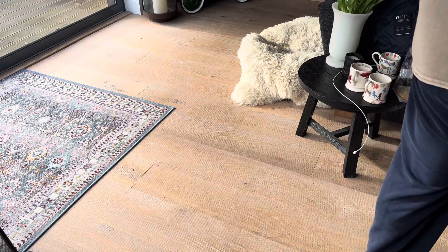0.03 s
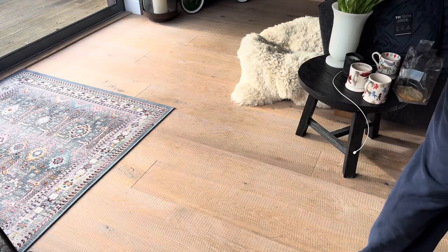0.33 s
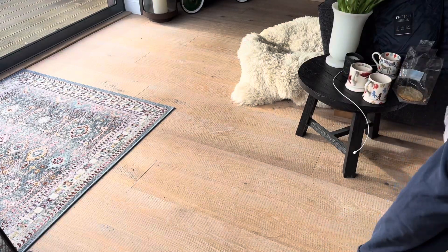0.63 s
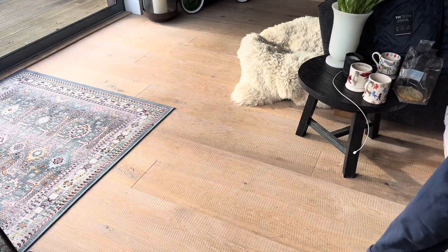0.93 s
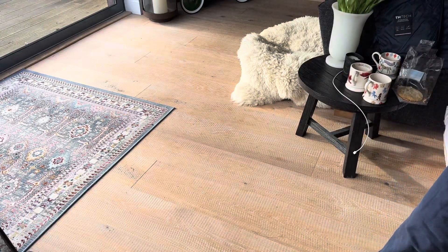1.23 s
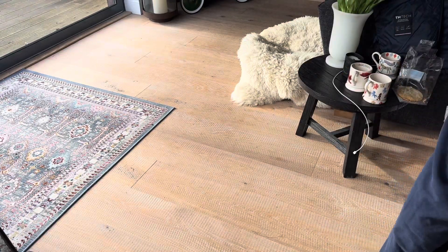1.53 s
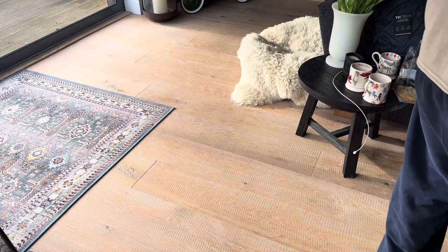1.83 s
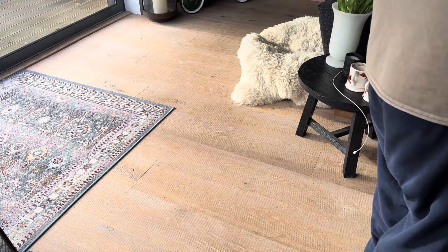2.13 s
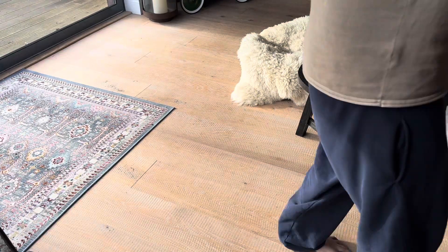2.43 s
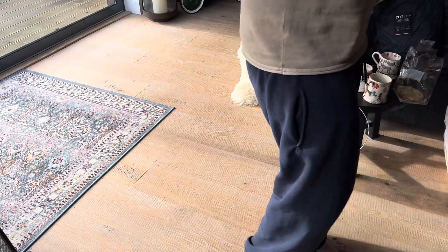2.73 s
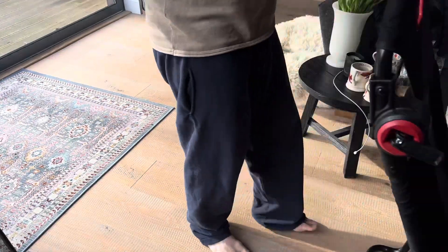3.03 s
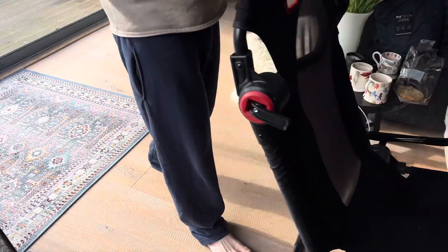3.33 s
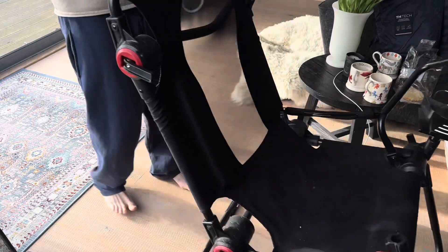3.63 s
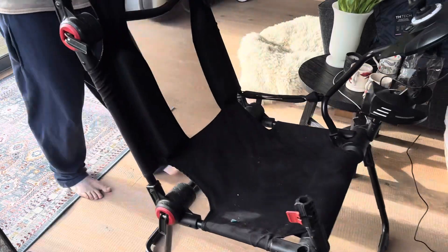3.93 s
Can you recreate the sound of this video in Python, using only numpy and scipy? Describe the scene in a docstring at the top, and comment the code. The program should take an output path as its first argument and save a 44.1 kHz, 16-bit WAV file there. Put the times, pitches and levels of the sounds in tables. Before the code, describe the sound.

In a quiet room, wheels rumble across floorboards after a few soft barefoot steps, clothing rustle and light ticks. The gritty rolling grows louder as it nears the microphone, with repeated bumps, a faint scrape and lightly ringing frame tubes.

```python
"""In a living room, a wheeled frame is pushed over a wooden floor, coming close to the microphones.
First come swishes of cloth, soft footsteps and small clicks of handling. Then the wheels drone, grit
under them shakes the boards, and they bump over the joints. A tyre scrapes, and the tubes of the
frame ring faintly as it passes."""
import sys
import numpy as np
from scipy import signal
from scipy.fft import rfft, irfft
from scipy.io import wavfile
from scipy.ndimage import uniform_filter1d

SR = 44100
rng = np.random.default_rng(int(sys.argv[2]) if len(sys.argv) > 2 else 0)


def put_to_file(sound):
    """Save the sound as 16-bit audio at rate SR, in the file named by the first command-line argument."""
    columns = np.atleast_2d(sound).T  # one column per channel
    safe = np.clip(columns, -1, 1)
    whole_steps = np.round(safe * 32767)
    wavfile.write(sys.argv[1], SR, whole_steps.astype(np.int16))


N = 176400
TIME, FREQ = np.arange(N) / SR, np.fft.rfftfreq(N, 1 / SR)
ROOM_ECHO_S = .22  # time to fade by 60 dB, called t60 below

# tone of the shaken floorboards (frequency [Hz], gain [dB])
FLOOR_TONE = [(42, -64), (60, -31), (90, -6.5), (130, -15.5), (210, -3.5), (260, -5), (330, -9.5), (430, 2),
              (560, -0.5), (760, -4), (1000, -13.5), (1400, -21), (3000, -60)]


def amp(db):
    """Turns decibels into a factor to multiply by."""
    return 10 ** (np.asarray(db) / 20)


def unit(x):
    """Scales a sound to an average strength (rms) of 1."""
    return x / np.sqrt(np.mean(x ** 2) + 1e-20)


def over_hz(table):
    """Joins a table's points into a curve over frequency, spaced by octaves."""
    hz, value = np.transpose(table)
    return np.interp(np.log(FREQ + 1), np.log(hz + 1), value)


def over_time(table, column=1):
    """Joins one column's points into a curve over time."""
    rows = np.array(table)
    return np.interp(TIME, rows[:, 0], rows[:, column])


def level(table, column=1):
    """Volume over time from a dB column, fading in just before the first row."""
    fade_in = np.clip((TIME - table[0][0]) * 20 + 1, 0, 1)
    return amp(over_time(table, column)) * fade_in


def envelope(start, rise, hold, t60):
    """Volume of one event: it rises, holds and dies away (all in seconds)."""
    t = TIME - start
    return np.clip(t / rise, 0, 1) * amp(-60 * np.maximum(t - rise - hold, 0) / t60)


def noise():
    """Two unrelated white noises."""
    return rng.standard_normal((2, N))


def colour(x, tone, tilt_db=0):
    """Filters a sound by a tone table; a positive tilt (dB per octave) brightens it."""
    octaves = np.log2(np.maximum(FREQ, 100) / SR)
    return unit(irfft(rfft(x) * amp(over_hz(tone) + tilt_db * octaves), N))


def flutter(rate_hz, depth_db):
    """A factor that wavers at random around 1, up to the given rate."""
    slow = irfft(rfft(rng.standard_normal(N)) / (1 + (FREQ / rate_hz) ** 4), N)
    return amp(depth_db * unit(slow))


def ring(x, t60):
    """Smears a sound into a tail of many random tones that fade together."""
    t = TIME[:SR // 2]
    tail = rng.standard_normal((2, len(t))) * amp(-60 * t / t60)
    return signal.fftconvolve(x, tail / np.linalg.norm(tail[0]), axes=1)[:, :N]


def resonate(x, hz, width_hz):
    """A resonance: keeps only the sound near one pitch, which may slide."""
    turn = np.exp(2j * np.pi * np.cumsum(hz * np.ones(N)) / SR)
    decay = np.exp(-np.pi * width_hz * np.sqrt(2) / SR)
    narrow = signal.lfilter([(1 - decay) ** 2], [1, -2 * decay, decay * decay], x / turn)
    return unit((turn * narrow).real)


def sustained(hz, width_hz, steadiness=.7):
    """A resonance fed without pause; steadiness (0 to 1) evens out its strength."""
    note = resonate(noise(), hz, width_hz)
    power = uniform_filter1d(abs(signal.hilbert(note)) ** 2, size=900, axis=1)
    evened = note / (abs(power) + 0.014) ** (steadiness / 2)
    return resonate(evened, hz, 4 * width_hz)


def room():
    """The faint, low hush of the room."""
    # tone of the hush (frequency [Hz], gain [dB])
    hush_tone = [(25, -23), (60, -1), (150, -2.5), (400, -5), (900, -12.5), (5000, -36), (15000, -31)]
    return amp(-62) * colour(noise(), hush_tone)


def footsteps():
    """Bare feet thud on the boards."""
    # steps and soft knocks (time [s], level [dB], rise [s], t60 [s], tilt [dB per octave])
    steps = [(0.041, -33.5, 0.0068, 0.39, 0), (0.1, -37, 0.0071, 0.61, 0), (0.164, -40, 0.0054, 0.39, 1),
             (0.235, -34.5, 0.0043, 0.25, -3), (.275, -39, 0.0059, 0.24, -20),
             (.401, -45, 0.0027, 0.12, 2.5), (.68, -49.5, 0.047, 0.33, 0.5),
             (0.749, -51.5, 0.0043, 0.38, 2.5), (0.869, -50, .008, 0.51, 2),
             (.915, -47.5, 0.011, 0.25, -18), (1.02, -55.5, 0.022, 0.58, 2), (1.157, -43, 0.0069, 0.28, 3)]
    # tone of a thud (frequency [Hz], gain [dB])
    thud_tone = [(28, -31), (65, 1), (110, -2), (170, 2.5), (270, -2.5), (400, -7), (700, -12), (1200, -20),
                 (3000, -47), (12000, -53)]
    return sum(amp(db) * envelope(start, rise, 0, t60) * colour(noise(), thud_tone, tilt)
               for start, db, rise, t60, tilt in steps)


def cloth():
    """Cloth and soles rub and swish."""
    # swishes (time [s], level [dB], rise [s], hold [s], t60 [s], tilt [dB per octave])
    swishes = [(-.01, -42, 0.012, 0.038, 0.39, -0.5), (0.22, -48.5, 0.01, .005, 0.5, -4.5),
               (0.393, -55, 0.0065, 0.032, 0.35, -4.5), (0.487, -57.5, 0.0027, 0.01, 0.48, -1.5),
               (0.867, -67.5, .006, .15, .4, -1), (1.07, -57, 0.021, 0.02, 0.32, -2.5),
               (1.157, -51.5, .008, 0.018, 0.2, 2)]
    # tone of a swish (frequency [Hz], gain [dB])
    swish_tone = [(100, -8.5), (400, -2.5), (1200, -1.5), (2500, -0.5), (5000, -8.5), (8500, -10),
                  (12000, -13.5), (15500, -17)]
    return sum(amp(db) * envelope(start, rise, hold, t60) * colour(noise(), swish_tone, tilt)
               for start, db, rise, hold, t60, tilt in swishes)


def clicks():
    """Sharp ticks from handling and from the frame echo in the room."""
    # ticks (time [s], level [dB], strongest frequency [Hz])
    ticks = [(0.2266, -48, 6460), (0.405, -56, 10000), (.446, -48, 9000), (.448, -42.5, 2100),
             (0.494, -52, 6960), (.5, -45.5, 2200), (1.1503, -39, 8000), (3.33, -26, 9100)]
    direct = np.zeros((2, N))
    for start, db, hz in ticks:
        octaves_away = abs(np.log2((FREQ + 1) / hz))
        band = unit(irfft(rfft(noise()) * amp(-13 * octaves_away), N))
        direct += amp(db) * envelope(start, rise=1 / SR, hold=0, t60=.008) * band
    return direct + amp(-5) * ring(direct, ROOM_ECHO_S)


def grit(hits_per_s=7000, spread_db=2):
    """Tiny impacts of uneven size under the wheels."""
    size = amp(spread_db * np.minimum(rng.exponential(1, N), 5))
    return unit(noise() * size * (rng.random(N) < hits_per_s / SR))


def squeak():
    """The frame gives one brief squeak."""
    return amp(-35) * envelope(start=3.59, rise=.0092, hold=.019, t60=.08) * sustained(2740, width_hz=56)


def tyre_scrape():
    """A tyre rubs as its wheel swings into line; its resonances swell at random."""
    # strength of the rubbing (time [s], level [dB])
    rubbing = [(1.67, -60), (1.71, -38.5), (1.8, -49), (2.1, -43), (2.6, -40), (2.97, -49.5), (3.1, -41),
               (3.72, -42.5), (4, -51)]
    # resonances of the scrape (pitch [Hz], relative level [dB])
    notes = [(2735, -1), (3100, 0), (3250, 0), (3400, -4), (3670, -3), (4090, -5), (4480, -7), (4890, -7),
             (5930, -8), (7910, -8), (8160, -9)]
    rub = grit()
    squeal = sum(amp(db) * resonate(rub, hz, width_hz=75) * flutter(rate_hz=11, depth_db=3.5)
                 for hz, db in notes)
    return level(rubbing) * unit(squeal)


def tubes():
    """The frame sings on one steady note while grit sets its other notes ringing."""
    # strength of the ringing (time [s], relative level [dB])
    ringing = [(1.2, -81), (1.6, -51), (2.04, -55), (2.12, -32), (2.3, -53), (2.68, -36), (2.96, -58),
               (3.1, -37), (3.42, -43.5), (3.55, -29), (3.8, -32), (4, -51)]
    # other notes of the tubes (pitch [Hz], relative level [dB])
    notes = [(1179, -37), (1367, -43), (1690, -43), (2020, -49), (2160, -49), (2325, -46), (2450, -45)]
    shake = grit()
    others = unit(sum(amp(db) * resonate(shake, hz, width_hz=17.6) for hz, db in notes))
    return level(ringing) * (amp(-3.5) * sustained(1733, width_hz=14) + amp(-2) * others)


def bumps():
    """The wheels jolt the floor at the joints between boards."""
    # jolts (time [s], level [dB])
    joints = [(1.495, -37), (1.939, -24), (2.416, -32), (2.809, -19.5), (3.211, -22), (3.528, -28)]
    jolts = sum(amp(db) * envelope(start, rise=.0037, hold=.036, t60=.34) for start, db in joints)
    return jolts * colour(noise(), FLOOR_TONE, tilt_db=0.3)


def floor_rumble():
    """Grit shakes the boards, which ring at their own pitches."""
    # strength of the rumble (time [s], relative level [dB])
    shaking = [(1.1, -64), (1.2, -45.5), (1.49, -29.5), (1.89, -30.5), (1.96, -25.5), (2.16, -24),
               (2.24, -22), (2.71, -20), (3.01, -26.5), (3.02, -21.5), (3.3, -23), (3.32, -19), (3.63, -23),
               (3.81, -22.5), (4.0, -33.5)]
    # resonances of the boards (pitch [Hz], width [Hz], relative level [dB])
    notes = [(435, 195, -9), (557.5, 16.5, 4.5), (615.4, 34, 0), (668.2, 11, -2.5), (768.4, 25, 1),
             (928, 80, -1), (1036, 12, -10)]
    boards = unit(sum(amp(db) * resonate(grit(), hz, width) for hz, width, db in notes))
    return level(shaking) * (amp(0.22) * colour(grit(), FLOOR_TONE) + amp(-4.5) * boards)


def rolling():
    """Grit makes floor and frame judder together, and hisses under the tyres."""
    # relative levels of the tyre noise (time [s], rattle [dB], hiss [dB], fizz [dB])
    tyres = [(1.05, -74, -88, -99), (1.16, -58, -68, -79), (1.26, -53.5, -63.5, -72),
             (1.49, -41.5, -54.5, -70), (1.67, -41, -53.5, -65), (1.72, -41, -50.5, -59.5),
             (1.94, -40, -49.5, -56), (1.98, -37.5, -52, -61.5), (2.4, -34.5, -43, -54),
             (3.02, -35.5, -45.5, -54.5), (3.23, -35, -46, -45.5), (3.72, -31, -42, -46.5),
             (4.0, -40, -55.5, -61.5)]
    # tone of the frame's rattle (frequency [Hz], gain [dB])
    rattle_tone = [(400, -51), (900, -0.5), (1150, 3), (1450, -3), (1700, 0.5), (2100, -6.5), (2500, -7.5),
                   (2800, -14), (4500, -29), (9000, -37)]
    # tone of the tyres' hiss (frequency [Hz], gain [dB])
    hiss_tone = [(1500, -28), (3200, 3.5), (4200, 0), (5200, -3), (6600, -0.5), (7300, -4.5), (8300, -2),
                 (9600, -9.5), (12000, -43)]
    # tone of the very high fizz (frequency [Hz], gain [dB])
    fizz_tone = [(5000, -40), (8200, -2), (10800, 10), (14400, -2.5), (15600, -15)]
    rumble = floor_rumble()
    rattle = amp(3.5) * level(tyres, column=1) * colour(ring(grit(), ROOM_ECHO_S), rattle_tone)
    hiss = amp(2) * level(tyres, column=2) * colour(ring(grit(), t60=.077), hiss_tone)
    fizz = amp(1) * level(tyres, column=3) * colour(ring(grit(), t60=.041), fizz_tone)
    judder, flicker = flutter(rate_hz=12, depth_db=1), flutter(rate_hz=40, depth_db=.4)
    return (rumble + rattle) * judder + (hiss + fizz) * flicker


def wheels():
    """The wheels drone, waking two booming notes in the frame and a hollow one in the floor."""
    # low drone, rising with speed (time [s], pitch [Hz], level [dB])
    droning = [(1.2, 75, -55), (1.245, 75, -36), (1.29, 76, -31.5), (1.35, 67.5, -43), (1.6, 64.6, -39.5),
               (1.88, 60, -44), (2.05, 66.5, -36.5), (2.2, 75, -32.5), (2.26, 81, -42), (2.33, 82, -38),
               (2.45, 81, -50), (2.8, 84, -33.5), (2.93, 76.6, -36), (3.0, 77.4, -31), (3.19, 83, -33),
               (3.26, 93, -40.5), (3.43, 100.5, -33.5), (3.62, 97, -34), (3.8, 74.4, -38)]
    # relative levels of the frame's notes (time [s], lower [dB], upper [dB])
    boom = [(1.15, -54, -53), (1.5, -29, -36), (1.63, -36.5, -31.5), (1.7, -27, -28), (1.88, -36, -37),
            (1.97, -28.5, -25.5), (2.13, -39, -32.5), (2.22, -35, -21.5), (2.36, -23.5, -19.5),
            (2.47, -29.5, -28.5), (2.68, -23.5, -21.5), (2.78, -28.5, -17.5), (2.9, -17, -28),
            (3.12, -27, -19), (3.33, -15, -21), (3.44, -29, -31), (3.82, -24.5, -30), (4.0, -38.5, -34)]
    # the upper note slides as the wheels turn (time [s], pitch [Hz])
    slide = [(1.98, 395), (2.18, 322), (2.37, 402), (2.52, 333), (2.72, 368), (3.1, 374), (3.36, 400),
             (3.66, 360)]
    # hollow note of the floor (time [s], level [dB])
    floor_note = [(1.2, -61), (1.39, -43.5), (2.1, -43.5), (2.45, -30.5), (2.7, -23.5), (2.82, -33),
                  (3.4, -40.5), (4, -35.5)]
    drone = level(droning, column=2) * sustained(over_time(droning), width_hz=10.4, steadiness=1)
    lower_hz = 301 * flutter(rate_hz=7, depth_db=.3)
    lower = level(boom, column=1) * sustained(lower_hz, width_hz=32)
    upper = amp(-0.5) * level(boom, column=2) * sustained(over_time(slide), width_hz=28)
    hollow = level(floor_note) * sustained(164.2, width_hz=13.7, steadiness=.71)
    return drone + lower + upper + hollow


def microphones(pair):
    """Turns two unrelated signals into what the left and right microphones hear."""
    # how alike the two sides are (frequency [Hz], likeness [0 to 1])
    likeness = [(120, .99), (300, 0.75), (480, 0.47), (750, 0.13), (1180, 0.72), (1600, 0.14), (3200, 0.67),
                (5000, 0.47), (6500, 0.52), (8000, 0.77), (10000, 1), (15000, 0.7)]
    # how much louder the left is (frequency [Hz], left minus right [dB])
    balance = [(80, 0), (300, 1.2), (1000, 1.5), (2400, 2.2), (5000, 2.5), (7000, 2), (8500, -0.5),
               (15000, 0.5)]
    # how far the left wave runs ahead (frequency [Hz], phase [radians])
    left_lead = [(0, 0), (330, 0), (620, -.6), (800, -1.4), (1400, -2.6), (2000, -.8), (3150, 1.7),
                 (4300, .3), (5500, .8), (7000, -.5), (8200, 0), (11100, -6.3), (15600, -15.5)]
    left, other = rfft(pair)
    same, lean = np.clip(over_hz(likeness), 0, 1), amp(over_hz(balance) / 2)
    right = (same * left + np.sqrt(1 - same ** 2) * other) * np.exp(-1j * over_hz(left_lead))
    return irfft(np.array([left * lean, right / lean]), N)


def scene():
    """The frame and the person pushing it, over the hush of the room."""
    frame = wheels() + rolling() + tubes() + bumps() + squeak() + tyre_scrape()
    person = footsteps() + cloth() + clicks()
    return microphones(frame + person + room())


def record(dry):
    """The recorder rounds off the highest peaks and cuts the very top of the treble."""
    ceiling, cutoff_hz = .72, 15700
    rounded = dry / (1 + (dry / ceiling) ** 6) ** (1 / 6)
    low_pass = signal.firwin(511, cutoff_hz, window=("kaiser", 9), fs=SR)
    return signal.oaconvolve(rounded, low_pass[None], "same")


dry = scene()
out = record(dry)
put_to_file(out)
```